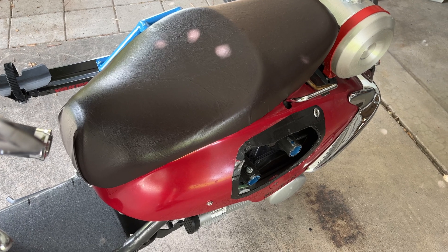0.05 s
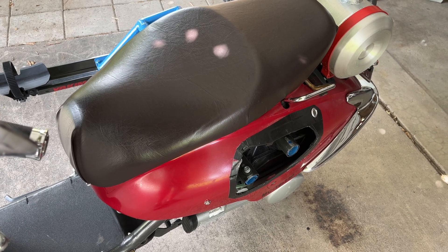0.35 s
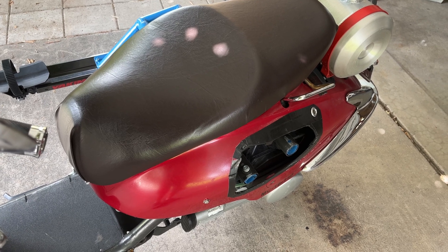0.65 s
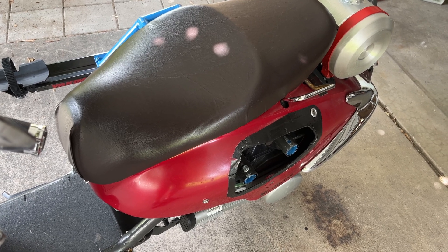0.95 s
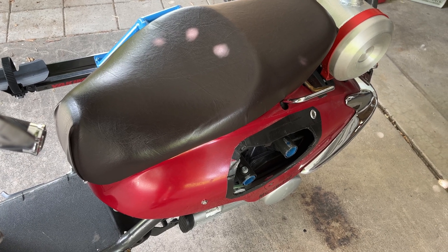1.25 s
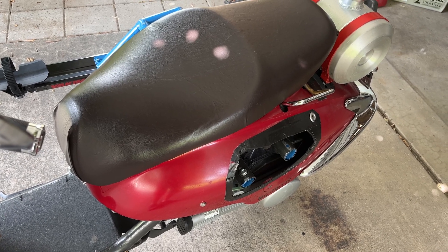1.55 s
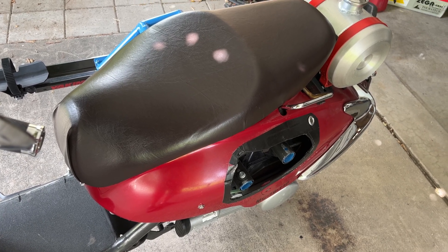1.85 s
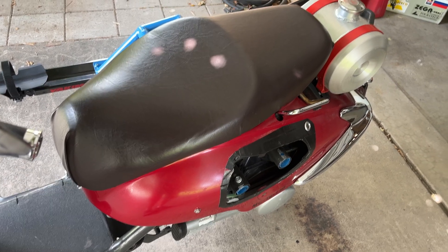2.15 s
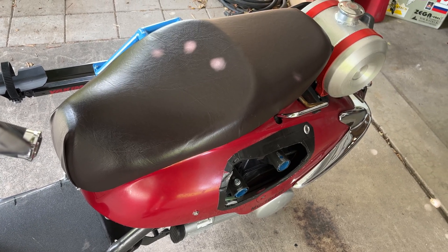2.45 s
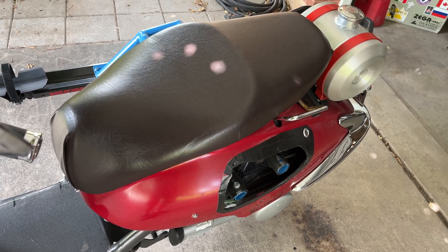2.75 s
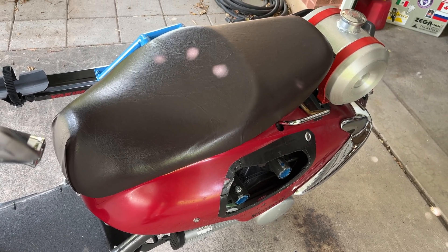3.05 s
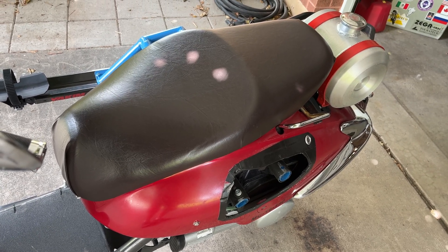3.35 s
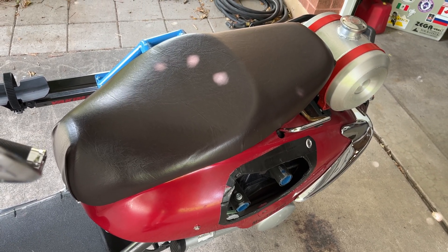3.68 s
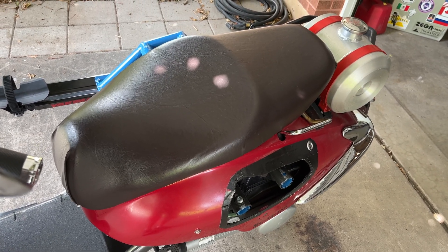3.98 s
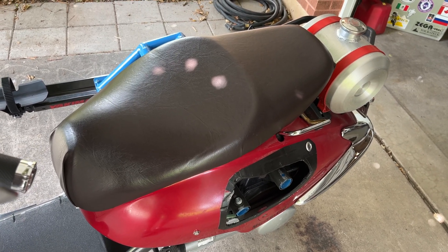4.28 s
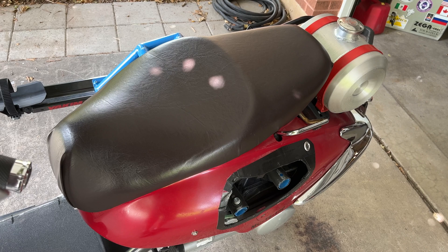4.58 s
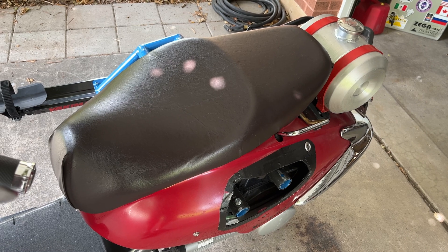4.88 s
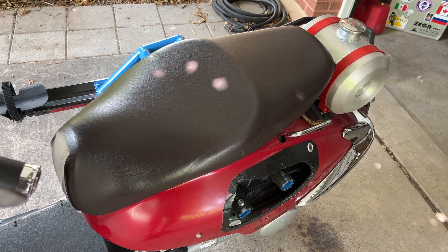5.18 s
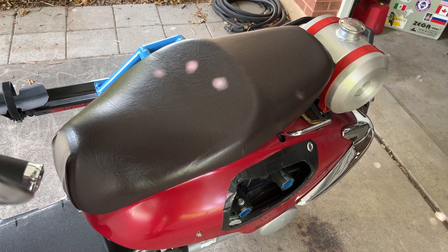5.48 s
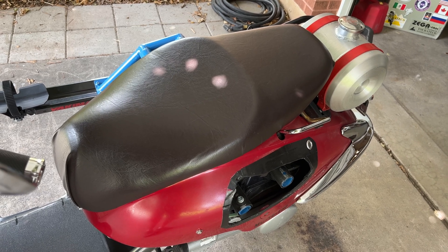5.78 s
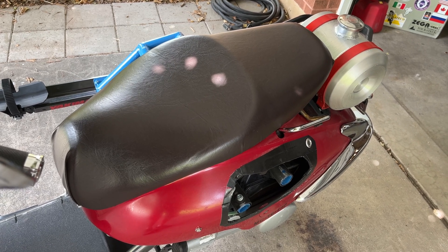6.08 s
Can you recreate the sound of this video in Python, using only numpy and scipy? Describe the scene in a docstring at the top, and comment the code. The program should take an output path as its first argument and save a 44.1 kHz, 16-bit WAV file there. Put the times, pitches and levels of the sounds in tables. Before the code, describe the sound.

At the open front of a garage, a nearby scooter fails to start. Its starter motor clicks in and labours through three bursts of gear whine, metallic rattle and engine churning, each ending in a raspy stall. Small clicks and soft taps follow over a faint outdoor rumble, before the starter clicks in again for one last heave. The engine does not catch, and the garage adds a brief echo.

```python
"""A faint outdoor rumble, then a click: a scooter's electric starter turns the engine at a garage mouth.
It heaves four times, but the engine never fires. In each heave the gears whine and rattle, slow down
as the piston squeezes the air, run free, then stall with a rasp and a thud and coast. The engine churns
and gulps air as it turns. The relay and drive click, the bodywork gives light taps in the long pause
before the last heave, and the garage adds a short echo."""
import sys
import numpy as np
from scipy import signal
from scipy.fft import rfft, irfft
from scipy.io import wavfile
from scipy.ndimage import uniform_filter1d

SR = 44100
rng = np.random.default_rng(int(sys.argv[2]) if len(sys.argv) > 2 else 0)


def wav_out(sig):
    """Save sig, one row per channel (or a flat mono array), as 16-bit PCM at SR to the path in sys.argv[1]."""
    wavfile.write(sys.argv[1], SR, np.round(np.clip(np.atleast_2d(sig).T, -1, 1) * 32767).astype(np.int16))


N = 274743
T = np.arange(N) / SR
HZ = np.fft.rfftfreq(N, 1 / SR)


def amp(db):
    """Turns decibels into a number to multiply by."""
    return 10 ** (np.asarray(db) / 20)


def evened(x):
    """Scales a signal to an average strength (rms) of 1."""
    return x / np.sqrt(np.mean(x ** 2) + 1e-20)


def look_up(points, hz):
    """Reads between the rows of a table, on a log-frequency scale."""
    row_hz, value = np.transpose(points)
    return np.interp(np.log(hz + 1), np.log(row_hz + 1), value)


def coloured(x, points):
    """Turns each frequency up or down by a table of Hz and dB."""
    return irfft(rfft(x) * amp(look_up(points, HZ)), N)


def wander(hz):
    """A random wobble of strength 1, no faster than about hz."""
    return evened(irfft(rfft(rng.standard_normal(N)) / (1 + (HZ / hz) ** 4), N))


def band(x, low_hz, high_hz):
    """Keeps the sound between two frequencies."""
    return signal.sosfilt(signal.butter(2, [low_hz, high_hz], "band", fs=SR, output="sos"), x)


def resonances(x, modes, leak=0):
    """Lets x ring an object's natural notes; leak is the share that passes straight through."""
    response = sum(amp(db) / (1 + 2j * (HZ - hz) / width) for hz, width, db in modes)
    return irfft(rfft(x) * (leak + response), N)


def bump(t, centre_s, width_s):
    """A smooth hill in time, of height 1."""
    return np.exp(-np.minimum(((t - centre_s) / width_s) ** 2, 20))


def add(mix, start_s, sound):
    """Mixes a sound in at start_s."""
    part = mix[round(start_s * SR):][:len(sound)]
    part += sound[:len(part)]


# The tone of the outdoors. Each row: frequency in Hz, relative level in dB.
OUTDOOR_TONE = [(15, -40.5), (25, -16.5), (49, -1.5), (158, -7.5), (196, -14.5), (344, -22.5), (373, -24),
                (462, -24.5), (637, -26), (1630, -29.5), (1960, -39), (2300, -36), (6370, -53),
                (15000, -66.5)]
# How alike left and right are. Each row: frequency in Hz, likeness from 0 to 1.
OUTDOOR_LIKENESS = [(60, 1), (240, 0.87), (950, 0.13), (3770, 0.27), (15000, 0.47)]
def outdoors(level_db=-58.5, low_cut_hz=38):
    """Steady, distant rumble and hiss, a little louder on the right."""
    left, other = rfft(rng.standard_normal((2, N)))
    alike = look_up(OUTDOOR_LIKENESS, HZ)
    right = alike * left + np.sqrt(1 - alike ** 2) * other
    air = evened(coloured(irfft(np.array([left, right]), N), OUTDOOR_TONE))
    air = amp(level_db) * air * amp([[-1], [1]])
    return signal.sosfilt(signal.butter(2, low_cut_hz, "high", fs=SR, output="sos"), air)


# The frame's notes. Each row: pitch in Hz, relative level in dB, seconds to fade by 60 dB.
FRAME_NOTES = [(185, -10, 0.085), (289, 0.5, 0.22), (432, -5.5, 0.44), (833, -19.5, 0.033)]
def thud(rise_s=.0057, panel_db=2, panel_fade_s=.15):
    """A soft blow rings the frame's low notes and makes the plastic panels boom."""
    t = T[:SR // 2]
    frame = sum(amp(db - 60 * t / fade_s) * np.sin(2 * np.pi * (hz * t + rng.random()))
                for hz, db, fade_s in FRAME_NOTES)
    panels = amp(panel_db - 60 * t / panel_fade_s) * evened(band(rng.standard_normal(len(t)), 150, 570))
    return (frame + panels) * (1 - np.exp(-t / rise_s))


# Clicks and taps. Each row: start in seconds, relative levels of the crack, thud and treble in dB,
# pitch of the ring in Hz, relative level of the ring in dB.
CLICKS_AND_TAPS = [(0.134, -35.5, -51, -49, 4560, -37.5), (2.396, -46.5, -60.5, -77, 5040, -68),
                   (2.887, -50, -86, -61, 1635, -44.5), (2.903, -38, -44, -45.5, 3800, -44.5),
                   (3.254, -67, -66, -81, 1897, -66), (3.341, -69, -80, -80, 8700, -69),
                   (3.362, -72, -65, -86, 8400, -77.5), (3.611, -63.5, -63, -89, 2680, -60),
                   (3.617, -87, -62.5, -89, 451, -49), (3.957, -64.5, -68.5, -66, 8200, -57.5),
                   (4.231, -75.5, -68, -96, 460, -55), (5.228, -39.5, -54, -48, 4400, -35)]
def clicks(rise_s=.001905, crack_fade_s=.056, treble_fade_s=.066, ring_fade_s=.08, boost_db=1.5):
    """Relay and drive clicks and taps on the bodywork: each is a crack, a short ring and a thud."""
    out, t = np.zeros(N), T[:SR // 2]
    onset = amp(boost_db) * (1 - np.exp(-t / rise_s))
    for start, crack_db, thud_db, treble_db, ring_hz, ring_db in CLICKS_AND_TAPS:
        noise = rng.standard_normal((3, len(t)))
        crack = amp(crack_db - 60 * t / crack_fade_s) * evened(band(noise[0], 1738, 4600))
        treble = amp(treble_db - 60 * t / treble_fade_s) * evened(band(noise[1], 6500, 14000))
        # played backwards, so the ring starts at full strength
        close_notes = evened(band(noise[2], ring_hz / 1.1, ring_hz * 1.1))[::-1]
        ring = amp(ring_db - 60 * t / ring_fade_s) * close_notes
        add(out, start, onset * (crack + treble + ring + amp(thud_db) * thud()))
    return out


FULL_SPEED_HZ, COAST_HZ = 880, 441.2  # gear speed in Hz means teeth meeting per second
BRAKE_LEAD_S, REST_S = .019, .21  # braking starts this long before a stall; a rest follows the stall
# The starter's heaves. Each row: times in seconds of the start, the gears biting and the heaviest load;
# cruising, labouring and free-running speeds in Hz; first and second dips in speed in Hz; extra level
# before the bite in dB; extra tooth force under load in dB; stall time in seconds; stall strength in dB.
STARTER_HEAVES = [(.133, .243, .337, 660, 524, 892, 5, 10, 5, 3.5, .652, -31),
                  (.925, 1.030, 1.092, 780, 530, 872, 105, 35, -2, 3, 1.415, -34),
                  (1.600, 1.750, 1.818, 780, 537, 866, 105, 70, -2.5, 3.5, 2.144, -32),
                  (5.228, 5.310, 5.470, 558, 480, 848, 30, 85, 3, -7.5, 5.800, -33)]
def gear_speed(spin_up_s=.05, sag_hz_per_s=1750, recover_hz_per_s=2300, climb_hz_per_s=250,
               brake_hz_per_s=9000, drag_every_s=.116, drag_width_s=.026):
    """The motor spins up, sags under load, recovers, then is braked by the air the piston squeezes."""
    hz = np.full(N, COAST_HZ)
    for start, _, load, cruise_hz, labour_hz, free_hz, *dips_hz, _, _, stall, _ in STARTER_HEAVES:
        during = (T >= start) & (T < stall + REST_S)
        t = T[during]
        since_load = t - load
        spinning_up = cruise_hz * (1 - np.exp(-(t - start) / spin_up_s))
        loading = np.minimum(spinning_up, labour_hz - sag_hz_per_s * since_load)
        recovery_s = (free_hz - labour_hz) / recover_hz_per_s
        running_free = free_hz + climb_hz_per_s * (since_load - recovery_s)
        running = np.minimum(labour_hz + recover_hz_per_s * since_load, running_free)
        for k, dip_hz in enumerate(dips_hz, 1):  # the crank drags twice
            running -= dip_hz * bump(since_load, k * drag_every_s, drag_width_s)
        braked = running - brake_hz_per_s * np.maximum(t - stall + BRAKE_LEAD_S, 0)
        hz[during] = np.where(since_load < 0, loading, np.maximum(braked, COAST_HZ))
    return uniform_filter1d(hz, size=400)


def count_teeth(hz, flutter=.012, brake_flutter=.035):
    """Teeth passed so far; the speed flutters, more so as the teeth bounce in the braking."""
    braking = sum(bump(T, stall, .03) for *_, stall, _ in STARTER_HEAVES)
    unsteady_hz = hz * (1 + (flutter + brake_flutter * braking) * wander(140))
    return np.cumsum(unsteady_hz) / SR


def tooth_pressure(free_db=4.5, slack_db=-8.5, brake_db=5):
    """How hard the teeth press on each other through each heave, as a gain."""
    db = np.zeros(N)
    for start, _, load, *_, load_db, stall, _ in STARTER_HEAVES:
        during = (T >= start) & (T < stall + REST_S)
        t = T[during]
        db[during] = (load_db * bump(t, load - .018, .033)
                      + free_db * bump(t, load + .24, .039)  # at full speed
                      + slack_db * bump(t, stall - .065, .03)  # the crank runs ahead of the motor
                      + brake_db * bump(t, stall, .023))
    return amp(db)


EASE_S, SNAP_S = .045, .008  # time for a heave to ease in, and for the gears to snap together
def heaving(attack_db, slack_db, hold_s, drop_db, drop_s, fade_db_per_s):
    """Loudness of the heaves: swells, snaps to full as the gears bite, holds, drops, then fades."""
    silent_db = -120.0
    db = np.full(N, silent_db)
    for start, bite, *_, early_db, _, stall, _ in STARTER_HEAVES:
        end = stall - BRAKE_LEAD_S + hold_s
        corners = [(start, attack_db + early_db - 9.5), (start + EASE_S, attack_db + early_db),
                   (bite, slack_db + early_db / 2), (bite + SNAP_S, 0), (end, 0),
                   (end + drop_s, drop_db), (end + drop_s + .5, drop_db - .5 * fade_db_per_s)]
        db = np.maximum(db, np.interp(T, *np.transpose(corners), left=silent_db, right=silent_db))
    return amp(db)


# The tones the teeth make. Each row: multiple of the gear speed, relative level in dB.
GEAR_TONES = [(1, -6), (2, 0), (3, -2.5), (4, -4.5), (5, -7), (6, -7)]
# The gear case's notes. Each row: pitch in Hz, width in Hz, relative level in dB.
GEAR_CASE_NOTES = [(702, 36, 0.5), (1040, 50, -8.5), (1157, 99, 4), (1331, 50, 2.5), (1691, 85, 5.5),
                   (2280, 120, -15), (2680, 230, -13), (3230, 150, -10), (3820, 130, -14)]
def whine(teeth, gain, roughness=.33, throb=.64, idler_teeth=19, gain_db=-35):
    """Gear tones flare as they slide past the case's notes; an off-centre idler gear makes them throb."""
    tones = sum(amp(db) * (1 + roughness * wander(120)) * np.cos(2 * np.pi * (k * teeth + rng.random()))
                for k, db in GEAR_TONES)
    ringing = resonances(tones, GEAR_CASE_NOTES, leak=amp(-19))
    heard = band(ringing, 620, 9700)  # the small case gives off little bass
    depth = throb * (np.gradient(teeth) * SR / FULL_SPEED_HZ) ** 2  # the wobble grows with speed
    wobble = 1 + depth * np.sin(2 * np.pi * teeth / idler_teeth + .89 * wander(31))
    return amp(gain_db) * gain * heard * wobble


def hum(hz, gain, pitch_ratio=.39, gain_db=-55):
    """The motor's slightly uneven pull makes a low note that follows the gears."""
    note = np.sin(2 * np.pi * np.cumsum(hz * pitch_ratio) / SR)
    return amp(gain_db) * gain * (1 + .1 * wander(24)) * note


# The tone of the rattle. Each row: frequency in Hz, relative level in dB.
RATTLE_TONE = [(200, -37.5), (800, -24), (1000, -3), (1450, -18), (1750, 0.5), (2000, -7), (2400, -1),
               (3800, -6), (5200, -11), (6500, -22.5), (8000, -15.5), (10300, -16), (12500, -33.5),
               (15000, -32.5)]
# Light steel parts that the blows set ringing. Each row: pitch in Hz, width in Hz, relative level in dB.
STEEL_NOTES = [(2260, 42, -2), (2310, 26, 0.5), (2825, 19, -2), (3238, 74, 0), (3800, 120, -2),
               (4115, 42, -5), (4720, 55, -7.5), (5200, 130, -10)]
def rattle(teeth, hz, slack=.028, spread_db=2.5, ring_s=.0043, scrape=.24, gain_db=-36.5, creep_db=-55):
    """Each tooth lands with its own force, harder at speed: sharp, gritty blows over a steady scrape."""
    landings = np.diff(np.floor(teeth + slack * wander(360)), prepend=0)  # loose teeth land early or late
    blows = landings * amp(spread_db * np.clip(rng.standard_normal(N), -2, 2))
    ringing = signal.lfilter([1], [1, -np.exp(-2 / (ring_s * SR))], blows ** 2)
    grit = np.sqrt(ringing / ringing.mean() + scrape ** 2) * rng.standard_normal(N)
    contact = evened(grit) + .45 * evened(band(blows, 2200, 15000))
    metal = evened(coloured(contact, RATTLE_TONE)) + .33 * evened(resonances(contact, STEEL_NOTES))
    force = (np.maximum(hz, COAST_HZ) / FULL_SPEED_HZ) ** .9
    force *= heaving(attack_db=-10, slack_db=-3.5, hold_s=.0099,
                     drop_db=-8, drop_s=.049, fade_db_per_s=149)
    return (amp(gain_db) * force + amp(creep_db) * creeping()) * evened(metal)


# The notes of the crankcase and belt cover. Each row: pitch in Hz, width in Hz, relative level in dB.
CRANKCASE_NOTES = [(210, 13, -11.5), (317, 7.4, 1.5), (390, 36, -17.5), (506, 51, 6), (721, 50, 7.5),
                   (983, 100, 9.5), (1132.6, 25, 7.5), (1304, 14, 12), (1522, 36, 4.5)]
def churn(hz, lumpy_db=-.4, gain_db=-42.5, creep_db=-52.5):
    """The crank, chain and belt drive turn inside their case, louder at speed."""
    knocking = evened(band(resonances(rng.standard_normal(N), CRANKCASE_NOTES), 130, 2900))
    force = (np.maximum(hz, COAST_HZ) / FULL_SPEED_HZ) ** .8
    force *= heaving(attack_db=-2.5, slack_db=0, hold_s=.078,
                     drop_db=-11.5, drop_s=.061, fade_db_per_s=129)
    return (amp(gain_db) * force + amp(creep_db) * creeping()) * amp(lumpy_db * wander(60)) * knocking


# Gulps of air. Each row: loudest moment in seconds, level in dB.
AIR_GULPS = [(0.401, -47), (1.138, -48.5), (1.87, -46), (5.496, -48)]
def intake(airbox_hz=62, width_s=.033):
    """The air box booms softly as the piston draws air in."""
    return sum(amp(db) * bump(T, peak, width_s) * np.sin(2 * np.pi * (airbox_hz * T + rng.random()))
               for peak, db in AIR_GULPS)


def chatter(teeth, width_s=.022, coast_db=-7.5, coast_s=.085, gain_db=-6):
    """At each stall the teeth bounce in their gaps: a rasp that dies away as the gears coast."""
    bursts = np.zeros(N)
    for *_, stall, db in STARTER_HEAVES:
        coast = amp(coast_db) * (T > stall) * np.exp(-abs(T - stall) / coast_s)
        bursts += amp(db) * (bump(T, stall, width_s) + coast)
    bounces = np.exp(-3 * (teeth / 2 % 1)) * rng.standard_normal(N)  # one every two teeth
    return amp(gain_db) * bursts * evened(band(bounces, 1100, 1600))


def stall_thuds(gain_db=-7.5):
    """Each stall jolts the frame."""
    out = np.zeros(N)
    for *_, stall, db in STARTER_HEAVES:
        add(out, stall, amp(db + gain_db) * thud())
    return out


# The starter button. Each row: time pressed in seconds, time let go in seconds.
BUTTON_HOLDS = [(.133, 2.384), (5.228, 5.95)]
def creeping():
    """Rises from 0 to 1 between heaves, while the button is held and the motor inches the piston on."""
    held = sum((T > press + REST_S) & (T < release) for press, release in BUTTON_HOLDS)
    busy = sum((T > start + EASE_S) & (T < stall + REST_S) for start, *_, stall, _ in STARTER_HEAVES)
    return uniform_filter1d(1. * held * (busy == 0), size=2200)


# How wide the scooter sounds. Each row: frequency in Hz, reflections against direct sound in dB.
STEREO_WIDTH = [(100, -15), (300, -7), (550, -5), (1100, -8), (2000, -7), (4000, -4), (8000, -6),
                (14000, -3)]
# Which way it leans. Each row: frequency in Hz, left level minus right level in dB.
STEREO_BALANCE = [(60, -3), (150, -7), (380, 7), (950, -2), (1500, -5.5), (2380, 2.5), (5980, 2.5),
                  (15000, -2)]
def near_reflections(x, decay_s=.0058):
    """Quick reflections off panels and concrete make left and right sound different."""
    t = T[:SR // 10]
    echoes = rng.standard_normal(len(t)) * np.exp(-t / decay_s)
    side = coloured(signal.fftconvolve(x, echoes / np.linalg.norm(echoes))[:N], STEREO_WIDTH)
    balance = amp(np.outer([.5, -.5], look_up(STEREO_BALANCE, HZ)))
    return irfft(rfft([x + side, x - side]) * balance, N)


# How long the garage rings. Each row: frequency in Hz, seconds to fade by 60 dB.
GARAGE_FADES = [(200, 0.54), (1300, 0.33), (4000, 0.45), (9000, 0.24), (15000, 0.29)]
def garage(x, build_s=.0085):
    """The garage's many echoes blur into one tail, different on each side."""
    t = T[:SR * 3 // 4]
    noise = rng.standard_normal((2, len(t))) * (1 - np.exp(-t / build_s))
    hz, seconds, spectrum = signal.stft(noise, SR, nperseg=256)
    fade = amp(-60 * seconds / look_up(GARAGE_FADES, hz)[:, None])
    tail = signal.istft(spectrum * fade, SR, nperseg=256)[1]
    return signal.fftconvolve(x[None], tail / np.linalg.norm(tail[0]), axes=1)[:, :N]


def scene(starter_echo_db=-8.5, knocks_echo_db=-6.5):
    """The starter and its knocks at the garage mouth, with the outdoors behind."""
    hz, pressure = gear_speed(), tooth_pressure()
    teeth = count_teeth(hz)
    gain = pressure * heaving(attack_db=-18.5, slack_db=-10, hold_s=.035,
                              drop_db=-22.5, drop_s=.027, fade_db_per_s=196.5)
    tones = whine(teeth, gain) + hum(hz, gain)
    starter = tones + pressure ** .44 * rattle(teeth, hz) + churn(hz) + chatter(teeth)
    knocks = clicks() + stall_thuds()
    echo = garage(amp(starter_echo_db) * starter + amp(knocks_echo_db) * knocks)
    return outdoors() + near_reflections(starter + knocks) + intake() + echo


def record(dry, top_hz=15800):
    """Cuts off the very highest treble."""
    low_pass = signal.firwin(511, top_hz, window=("kaiser", 9), fs=SR)
    return signal.oaconvolve(dry, low_pass[None], "same")


dry = scene()
out = record(dry)
wav_out(out)
```